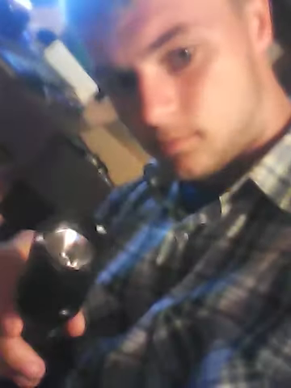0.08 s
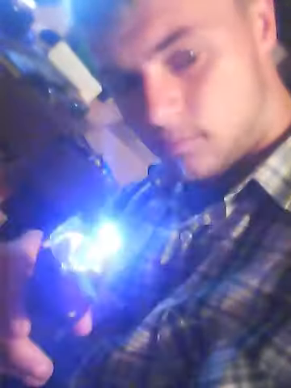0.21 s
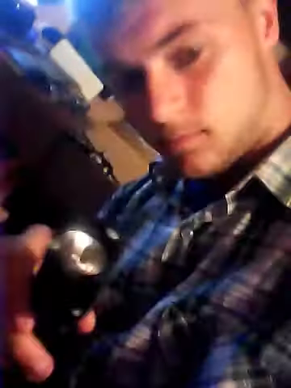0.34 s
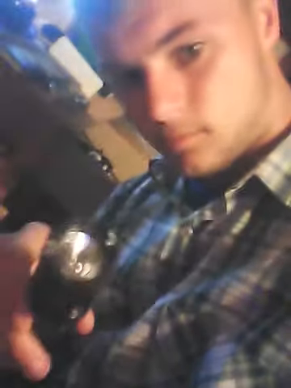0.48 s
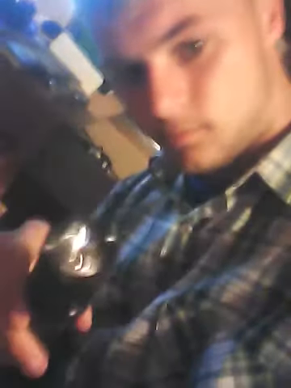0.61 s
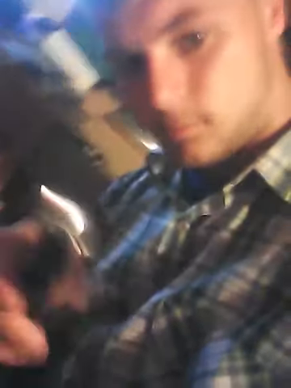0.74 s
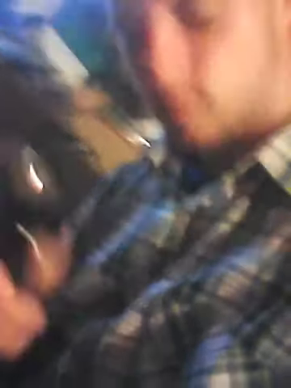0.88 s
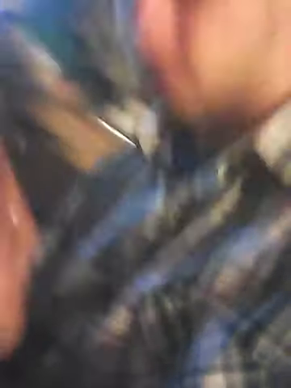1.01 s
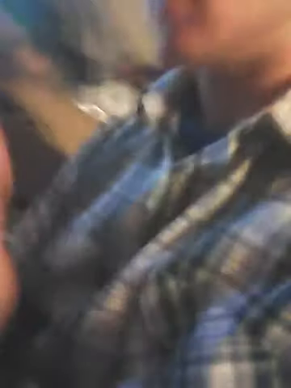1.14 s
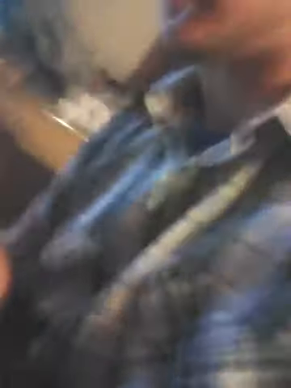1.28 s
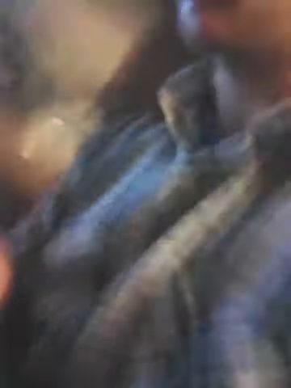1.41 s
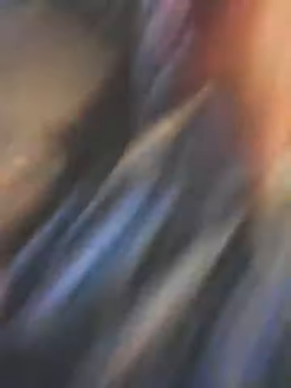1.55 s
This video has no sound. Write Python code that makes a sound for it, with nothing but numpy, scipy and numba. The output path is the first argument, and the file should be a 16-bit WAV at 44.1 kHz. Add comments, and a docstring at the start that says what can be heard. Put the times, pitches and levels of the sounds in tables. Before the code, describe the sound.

A stun gun discharges close to the microphone in a small quiet room: three bright electric snaps in quick succession, squashed into one short blast, a brief echo, then a small knock, soft bumps and faint clicks.

```python
"""A handheld stun gun snaps three times close to the microphone in a small, quiet room.
Each spark is a bright snap with a dense noise echo, a dull pop and a sine thump that sinks in pitch;
a fast limiter flattens it into a short blast. Faint handling sounds: ringing noise bursts (clicks),
damped tones (knocks) and soft low bumps. Behind them lie filtered-noise air, rumble and hum."""
import sys
import numpy as np
from scipy import signal
from scipy.fft import rfft, irfft
from scipy.io import wavfile
from scipy.ndimage import uniform_filter1d, minimum_filter1d
from numba import njit

SR = 44100
rng = np.random.default_rng(int(sys.argv[2]) if len(sys.argv) > 2 else 0)


def transcribe(u):
    """Save the signal u as a 16-bit wav file named by the first command-line argument.

    u: samples, shape (n,) or (channels, n), limited to [-1, 1]; the rate is SR.
    q: integer samples, one column per channel.
    """
    v = np.clip(np.atleast_2d(u).T, -1, 1)
    q = np.round(v * 32767).astype(np.int16)
    wavfile.write(sys.argv[1], SR, q)


N = 70560


def undb(db):
    """Decibels to amplitude gain."""
    return 10 ** (np.asarray(db) / 20)


def unit(x):
    """Scale to rms 1."""
    return x / np.sqrt(np.mean(x ** 2))


def fade(t, t60_s):
    """Exponential decay, 60 dB down after t60_s."""
    return np.exp(-np.log(1000) * np.maximum(t, 0) / t60_s)


def bell(t, spread_s):
    """Gaussian swell around t = 0, down to 1/e at spread_s."""
    return np.exp(-(t / spread_s) ** 2)


def convolve(x, response):
    """Play x through an impulse response."""
    return signal.fftconvolve(x, response)[:N]


def colour(x, points):
    """Minimum-phase filter through (hz, relative db) points, with unit power gain."""
    hz, db = np.array(points, float).T
    freq_hz = np.maximum(np.fft.rfftfreq(2 * N, 1 / SR), 1)
    gain = unit(undb(np.interp(np.log(freq_hz), np.log(hz), db)))
    # Folding the cepstrum onto positive time makes the filter causal.
    cepstrum = irfft(np.log(gain))
    cepstrum[1:N] *= 2
    cepstrum[N + 1:] = 0
    response = np.exp(rfft(cepstrum))
    return irfft(rfft(x, 2 * N) * response)[:N]


def resonate(x, modes):
    """Sum of steep-sided resonances (hz, width_hz, relative db), with unit power gain."""
    t = np.arange(N) / SR
    ring = np.zeros(N)
    for hz, width_hz, db in modes:
        envelope = width_hz ** 2 * t * np.exp(-np.pi * width_hz * t)
        ring += undb(db) * envelope * np.sin(2 * np.pi * hz * t)
    return convolve(x, ring / np.linalg.norm(ring))


def at(x, start_s):
    """Delay a sound to its start time."""
    return np.concatenate([np.zeros(int(max(start_s, 0) * SR)), x])[:N]


def room_tone(t):
    """Filtered-noise air and rumble with a slowly moving level, plus hum from narrow noise bands."""
    # air spectrum: freq_hz, relative_db
    air_colour = [(160, -23), (280, -11.5), (360, -5.5), (450, -10.5), (520, -5), (620, -8), (780, -2.5),
                  (870, -8.5), (1020, -1), (1120, -11), (1800, -12), (2050, -9), (2600, -13), (3000, -20.5),
                  (4000, -24.5), (5600, -31.5), (15500, -37)]
    # rumble spectrum: freq_hz, relative_db
    rumble_colour = [(22, -35), (45, -13.5), (58, -5.5), (74, 0), (98, -12), (135, -5), (160, -2.5),
                     (200, -7), (250, -5.5), (310, -22.5), (450, -44.5)]
    # hum bands: freq_hz, width_hz, level_db
    hum_bands = [(74, 8.6, -60), (481, 42, -73.5), (782, 25, -75.5), (981.5, 45, -68)]
    # air and rumble level curve: time_s, gain_db
    background_level = [(0, 2.5), (.2, 2.5), (.5, 3.5), (.6, -1.5), (.87, -1), (.95, -0.5), (1.1, 0.5),
                        (1.22, -0.5), (1.4, 0.5), (1.6, 0.5)]
    air_db, rumble_db = -59.5, -47.5

    air = undb(air_db) * colour(rng.standard_normal(N), air_colour)
    rumble = undb(rumble_db) * colour(rng.standard_normal(N), rumble_colour + [(2000, -88)])
    hum = np.zeros(N)
    for hz, width_hz, db in hum_bands:
        hum += undb(db) * unit(resonate(rng.standard_normal(N), [(hz, width_hz, 0)]))
    times_s, gains_db = np.array(background_level).T
    return (air + rumble) * undb(np.interp(t, times_s, gains_db)) + hum


def bumps(t):
    """Things being moved: low sines under Gaussian swells."""
    # bumps: centre_s, pitch_hz, spread_s, level_db
    bump_events = [(0.057, 63.7, 0.063, -36), (.085, 162, 0.0078, -30.5), (0.162, 67.5, 0.027, -40),
                   (.172, 188, 0.0076, -31.5), (0.471, 74, 0.091, -46.5), (.485, 185, 0.019, -44),
                   (.62, 75.45, 0.016, -40.5), (0.786, 71.7, 0.041, -44.5), (.978, 173.7, 0.0087, -33.5),
                   (1.272, 68.5, 0.029, -42), (1.438, 80, 0.019, -33.5), (1.551, 183, 0.004, -34.5)]
    out = np.zeros(N)
    for centre_s, hz, spread_s, db in bump_events:
        since = t - centre_s
        out += undb(db) * bell(since, spread_s) * np.sin(2 * np.pi * hz * since)
    return out


def knocks(t):
    """Dull knocks of the grip: a quickly damped tone with one inharmonic overtone."""
    # knocks: start_s, pitch_hz, level_db, t60_s
    knock_events = [(0.4977, 1185, -21.5, 0.0055), (1.3620, 1400, -37, 0.012)]
    overtone_ratio, overtone_db, rise_s = 1.43, -7, 0.00048
    out = np.zeros(N)
    for start_s, hz, db, t60_s in knock_events:
        phase = 2 * np.pi * hz * t
        tone = np.sin(phase) + undb(overtone_db) * np.sin(overtone_ratio * phase)
        envelope = fade(t, t60_s) * (1 - np.exp(-t / rise_s))
        out += at(undb(db) * tone * envelope, start_s)
    return out


def clicks(t):
    """Brief scraping contacts: short noise bursts that ring the handled plastic."""
    # clicks: start_s, level_db, contact_s, tick_hz, snap_db, scrape_db
    click_events = [(1.3026, -38, 0.0029, 6150, -10, -1.5), (1.3769, -29.5, 0.00089, 6380, 1.5, -30),
                    (1.5490, -43, 0.0007, 5430, -29, -19.5)]
    # bright plastic resonances: freq_hz, width_hz, relative_db
    plastic_modes = [(9400, 1500, 22.5), (10240, 970, 21), (12000, 2700, -13)]
    # scrape spectrum: freq_hz, relative_db
    scrape_colour = [(300, 22), (1000, 16), (2800, 14.5), (4000, 11), (8500, -30), (12000, 15.5),
                     (15500, 2)]
    contact_rise_s = 0.00018
    tick_width_hz = 1400
    low_mode = (2960, 300, -10)  # freq_hz, width_hz, relative_db

    out = np.zeros(N)
    for start_s, db, contact_s, tick_hz, snap_db, scrape_db in click_events:
        envelope = bell(t, contact_s) * (1 - bell(t, contact_rise_s))
        contact = rng.choice([-1., 1.], N) * envelope
        tick = resonate(contact, [(tick_hz, tick_width_hz, 0), low_mode])
        snap = undb(snap_db) * resonate(contact, plastic_modes)
        scrape = undb(scrape_db) * colour(contact, scrape_colour)
        out += at(undb(db) * (tick + snap + scrape), start_s)
    return out


def handling(t):
    """Knocks and clicks with a decaying-noise room echo, plus dry bumps."""
    # echo spectrum: freq_hz, relative_db
    room_colour = [(500, 2), (2000, 5.5), (4800, 7), (6500, 6), (9500, -5), (15000, 7.5)]
    room_db, room_t60_s, echo_delay_s = -5, 0.076, .002
    tail = rng.standard_normal(N) * fade(t, room_t60_s) * (t > echo_delay_s)
    room = colour(tail, room_colour)
    direct = knocks(t) + clicks(t)
    echo = undb(room_db) * convolve(direct, room / np.linalg.norm(room))
    return direct + echo + bumps(t)


def spark_snap(t, arc):
    """Bright first arrival: a very short high-passed noise burst."""
    level_db, t60_s, low_cut_hz = 4, .007, 5150
    high_pass = signal.butter(2, low_cut_hz, "high", fs=SR, output="sos")
    return undb(level_db) * signal.sosfilt(high_pass, arc * fade(t, t60_s))


def spark_echo(t, diffuse, distinct, arc):
    """Dense room echo: noise, sparse impulses and narrow rings; treble dies sooner than the rest."""
    # echo spectrum: freq_hz, relative_db
    crack_colour = [(250, -23), (500, -31.5), (850, -15.5), (1500, -9), (2070, 0.5), (2520, -3.5),
                    (2710, 1.5), (2900, -3.5), (3800, 1.5), (4300, -2), (5700, 2), (6250, 2.5), (6750, 5.5),
                    (7900, 3), (8300, -1), (8900, 5.5), (9550, 6.5), (10800, 2.5), (15500, 2)]
    # narrow ringing resonances: freq_hz, width_hz, relative_db
    ring_modes = [(2058, 121.3, -1.5), (2718, 70, 4), (6694, 260, 1), (9514, 282, 2)]
    level_db, rings_db = 7.5, -12.5
    distinct_share = 0.73  # of power
    split_hz, mids_t60_s, treble_t60_s = 3500, 0.14, .122

    reflections = np.sqrt(1 - distinct_share) * diffuse + np.sqrt(distinct_share) * distinct
    echo = colour(reflections, crack_colour) + undb(rings_db) * resonate(arc, ring_modes)
    mids = signal.sosfiltfilt(signal.butter(1, split_hz, fs=SR, output="sos"), echo)
    treble = echo - mids
    return undb(level_db) * (mids * fade(t, mids_t60_s) + treble * fade(t, treble_t60_s))


def spark_pop(t, noise):
    """Dull pop just after the snap: coloured noise under a Gaussian swell."""
    # pop spectrum: freq_hz, relative_db
    body_colour = [(100, 5.5), (250, -3), (480, -6.5), (820, 1.5), (1050, -5.5), (1450, 1), (3000, -25.5),
                   (12000, -56.5)]
    level_db, peak_s, spread_s = 0.5, 0.0048, 0.0055
    return undb(level_db) * colour(noise * bell(t - peak_s, spread_s), body_colour)


def spark_thump(t):
    """Sine sinking quickly in pitch, with a short thump decay and a longer boom decay."""
    start_hz, end_hz, sink_s, rise_s = 280.5, 47.6, .0065, 0.0018
    thump_db, thump_t60_s, boom_db, boom_t60_s = 20.5, 0.02, 3, 0.1
    hz = end_hz + (start_hz - end_hz) * np.exp(-t / sink_s)
    decay = undb(thump_db) * fade(t, thump_t60_s) + undb(boom_db) * fade(t, boom_t60_s)
    swell = decay * (1 - bell(t, rise_s))
    return -swell * np.sin(2 * np.pi * np.cumsum(hz) / SR)


def sparks(t):
    """Each discharge sets off the same snap, echo, pop and thump, balanced anew."""
    # discharges: start_s, crack_db, pop_db, thump_db
    discharges = [(0.2243, 6, 9, 5), (0.2646, 1.5, -6.5, -9), (0.3274, -0.5, -6.5, -16)]
    echoes_per_s = 2000
    diffuse, sizes, pop_noise, arc = rng.standard_normal((4, N))
    distinct = unit(np.sign(sizes) * (rng.random(N) < echoes_per_s / SR))
    crack = spark_snap(t, arc) + spark_echo(t, diffuse, distinct, arc)
    pop, thump = spark_pop(t, pop_noise), spark_thump(t)
    out = np.zeros(N)
    for start_s, crack_db, pop_db, thump_db in discharges:
        out += at(undb(crack_db) * crack + undb(pop_db) * pop + undb(thump_db) * thump, start_s)
    return out


def scene():
    """Sparks, handling and room at one microphone."""
    t = np.arange(N) / SR
    return (sparks(t) + handling(t) + room_tone(t))[None]


@njit
def hold_peaks(level, keep):
    """Follow rises at once and let go gradually."""
    out, held = np.empty(len(level)), 0.
    for i in range(len(level)):
        held = max(level[i], held * keep + level[i] * (1 - keep))
        out[i] = held
    return out


def record(dry):
    """Fast look-ahead limiter on short-term rms, rounded peaks and a steep treble cut."""
    top_hz, ceiling = 15700, .95
    limit_db, sense_s, release_s, look_ahead_s = -9, 0.0013, 0.00088, .0015
    treble_cut = signal.ellip(12, .2, 90, top_hz, fs=SR, output="sos")
    x = signal.sosfilt(treble_cut, dry[0])
    power = uniform_filter1d(x ** 2, max(int(sense_s * SR), 1))
    level = np.sqrt(np.abs(power))
    held = hold_peaks(level, np.exp(-1 / (release_s * SR)))
    limit = undb(limit_db)
    ahead = int(look_ahead_s * SR)
    lowest_gain = minimum_filter1d(limit / np.maximum(held, limit), ahead)
    gain = uniform_filter1d(lowest_gain, ahead)
    rounded = ceiling * np.tanh(x * gain / ceiling)
    return signal.sosfiltfilt(treble_cut, rounded)[None]


dry = scene()
out = record(dry)
transcribe(out)
```